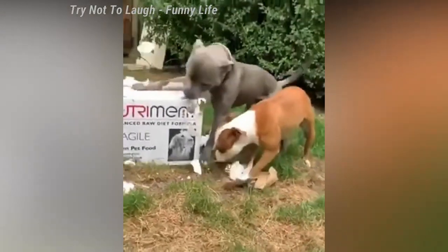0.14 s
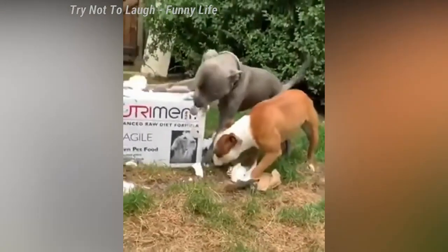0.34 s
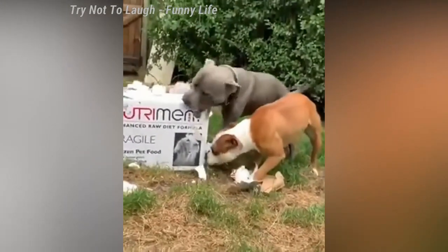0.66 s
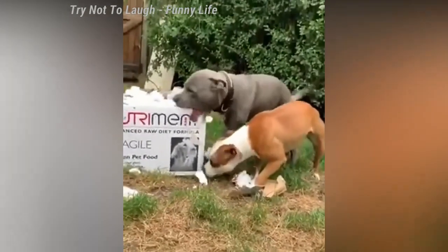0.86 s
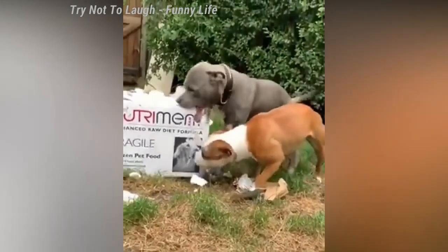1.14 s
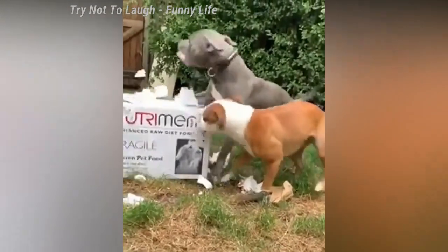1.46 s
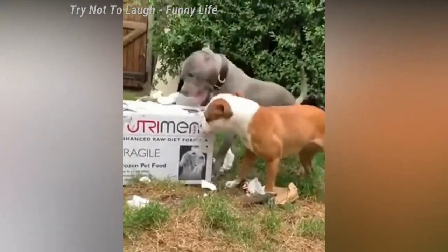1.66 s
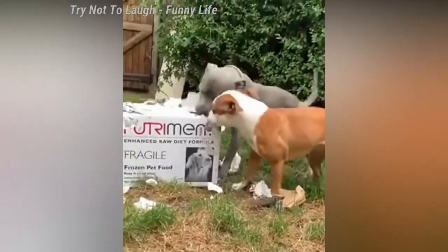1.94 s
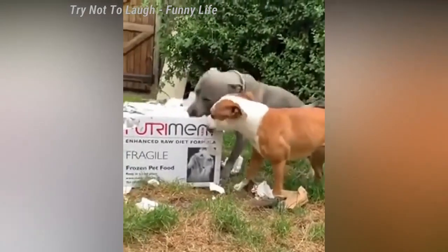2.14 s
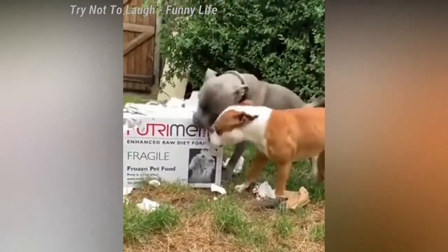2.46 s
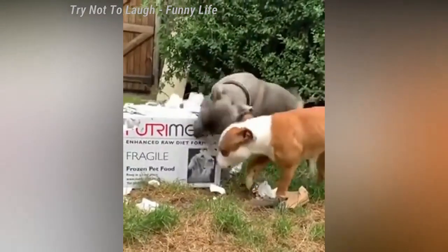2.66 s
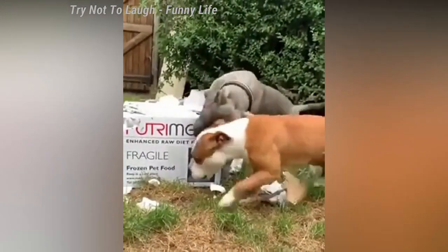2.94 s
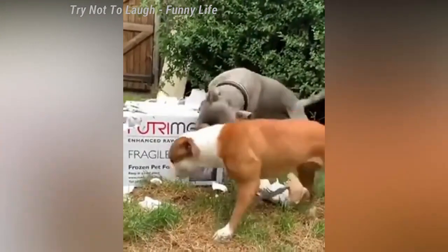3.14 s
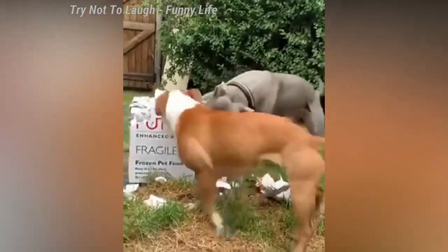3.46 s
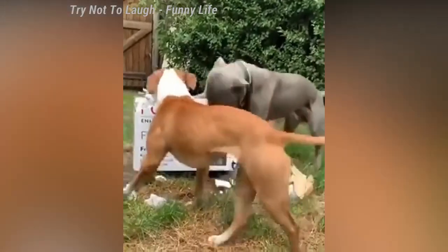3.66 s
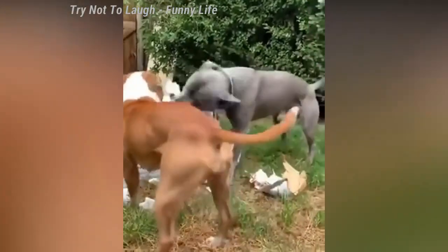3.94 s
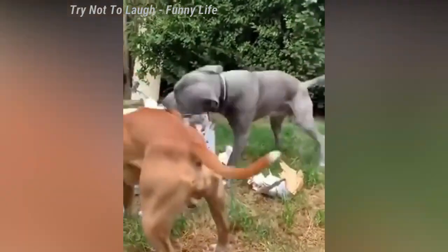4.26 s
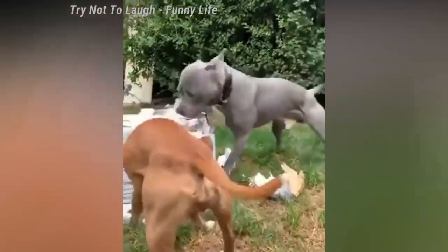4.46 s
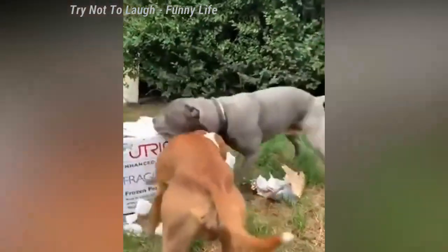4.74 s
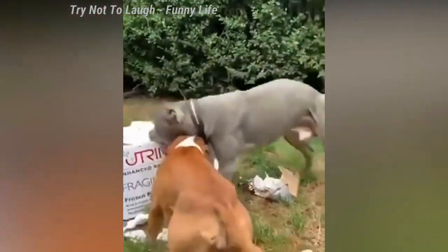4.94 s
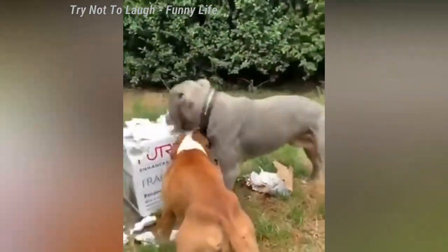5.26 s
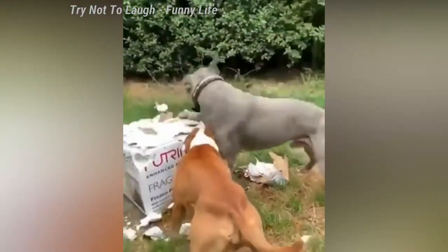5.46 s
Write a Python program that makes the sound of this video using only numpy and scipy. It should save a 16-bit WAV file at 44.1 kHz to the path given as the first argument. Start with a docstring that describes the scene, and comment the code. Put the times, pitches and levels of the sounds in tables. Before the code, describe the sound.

Dogs tear at a foam-lined cardboard box outdoors, with gritty crackling, short rips, sharp snaps and hollow knocks over a faint low rumble.

```python
"""Crackle, rips and sharp snaps as two dogs bite and tear at a foam-lined cardboard box on a lawn.
Clumped random breaks drive the foam, the ringing walls and the hollow; each snap adds a crack and blows.
Below lie a low rumble of filtered noise that swells at each snap, and a drifting sine drone that fades.
A short noise blur follows the box; the two channels differ in phase, unsteadily, in the treble."""
import sys
import numpy as np
from scipy import signal
from scipy.fft import rfft, irfft
from scipy.io import wavfile
from scipy.ndimage import uniform_filter1d

SR = 44100
rng = np.random.default_rng(int(sys.argv[2]) if len(sys.argv) > 2 else 0)


def inscribe(sig):
    """Save sig as 16-bit PCM at rate SR to the path in sys.argv[1].

    A 1-D sig is mono; a 2-D sig holds one channel per row.
    Samples are clipped to [-1, 1] before scaling.
    """
    pcm = np.round(np.clip(np.atleast_2d(sig).T, -1, 1) * 32767)
    wavfile.write(sys.argv[1], SR, pcm.astype(np.int16))


N = 246519

# Single breaks and knocks. Each row: start in seconds, foam level in dB, walls level in dB,
# hollow level in dB, struck wall pitch in Hz, struck hollow pitch in Hz, nominal T60 in seconds.
SNAP_EVENTS = [(0.043, -44, -20, -34, 1020, 394, 0.021), (0.433, -37, -38, -33, 1160, 270, 0.033),
               (0.643, -64, -33.5, -33.5, 660, 456, 0.017), (0.7108, -40, -27, -30.5, 1230, 173, 0.059),
               (0.762, -32, -17.5, -36, 1640, 482, 0.0062), (0.9419, -29.5, -38, -43, 1960, 149, 0.015),
               (0.970, -42, -51, -50, 2000, 200, .009), (1.013, -42, -52, -40, 2000, 200, 0.01),
               (1.1638, -13.5, -28, -30.5, 1690, 386, 0.028), (1.2045, -22, -26, -26, 690, 307, 0.023),
               (1.223, -16, -12.5, -15.5, 1340, 395, 0.011), (1.2964, -38, -22, -45, 1060, 136, 0.014),
               (1.383, -28, -12.5, -21, 2320, 228, 0.0091), (1.437, -28, -39, -21, 2100, 191, 0.012),
               (1.458, -45, -14, -22, 1070, 248, 0.012), (1.4694, -50, -15.5, -20.5, 1100, 290, 0.012),
               (1.49, -27, -20, -33, 1600, 250, 0.022), (1.734, -34.5, -35, -39, 1220, 248, 0.035),
               (1.85, -67, -31, -57, 1200, 154, 0.035), (2.0217, -34, -40, -36, 960, 180, 0.055),
               (2.392, -51, -25.5, -37, 1040, 171, 0.031), (2.628, -55, -53, -29.5, 700, 233, 0.041),
               (2.646, -37, -26.5, -26, 970, 245, 0.0063), (2.676, -42, -33, -29, 1250, 198, 0.018),
               (2.8, -32, -35, -22, 700, 266, 0.022), (2.813, -30.5, -18.5, -25.5, 1270, 143.6, 0.011),
               (2.8202, -23.5, -33, -23.5, 1500, 197, 0.0096), (2.888, -34, -34, -22.5, 721, 303, 0.0057),
               (3.074, -38, -27, -26.5, 770, 468, 0.0062), (3.1555, -45.5, -29.5, -9, 890, 214, 0.023),
               (3.328, -31, -33, -19.5, 704, 200, 0.011), (3.3546, -24, -21.5, -13, 690, 174, 0.027),
               (3.4293, -30, -14.5, -15, 1880, 330, 0.032), (3.435, -34, -39, -20, 1990, 260, 0.0078),
               (3.4644, -32.5, -41, -24.5, 1600, 378, 0.021), (3.532, -44, -40, -25.5, 700, 260, 0.015),
               (3.5714, -33.5, -30, -32.5, 1100, 385, 0.041), (3.608, -19, -18, -16.5, 950, 410, 0.011),
               (3.6318, -37, -24.5, -21.5, 710, 332, 0.039), (3.684, -30, -29, -12.5, 1020, 254, 0.0093),
               (3.7608, -38, -51, -14.5, 713, 557, 0.0086), (3.77, -19, -17.5, -10.5, 690, 254, 0.01),
               (4.0787, -30.5, -21, -16, 1260, 250, 0.042), (4.345, -51, -37, -58, 703, 159, 0.029),
               (4.4041, -43, -24, -21, 1030, 160, 0.047), (4.6148, -46, -19.5, -23, 880, 570, 0.023),
               (4.6621, -39, -44, -32.5, 1170, 149, 0.24), (4.8378, -45, -25.5, -25.5, 910, 280, 0.019),
               (4.853, -37, -32, -31, 1080, 242, 0.012), (5.008, -55, -18.5, -36, 1040, 197, 0.017),
               (5.034, -27.5, -17.5, -18, 1050, 290, 0.019), (5.0609, -37, -16, -19.5, 1240, 384, 0.005),
               (5.1211, -35, -23, -17.5, 1050, 220, 0.021), (5.2025, -25, -12.5, -39, 2600, 133, 0.0036),
               (5.2058, -36, -18.5, -25, 870, 400, 0.0058), (5.2464, -25, -24.5, -19, 1960, 328, 0.049),
               (5.295, -20, -13.5, -28, 2400, 435, 0.01), (5.2994, -26.5, -11.5, -17.5, 2410, 430, 0.0068),
               (5.407, -24, -18, -12.5, 835, 228, 0.015), (5.538, -51, -27.5, -42, 1210, 198, 0.018)]
# Modes of the cardboard walls. Each row: frequency in Hz, bandwidth in Hz, relative level in dB.
WALL_MODES = [(715, 148, 14), (861, 77, 4), (1082, 207, 13), (1659, 356, 8), (2103, 360, 8), (2625, 820, 5)]
# Modes of the air in the box. Each row: frequency in Hz, bandwidth in Hz, relative level in dB.
HOLLOW_MODES = [(113.1, 29, 0.5), (171.6, 85, -8), (200.5, 82, -6), (258.8, 176, 8), (328, 130, -1),
                (408, 155, -1.5), (602, 510, -14)]
# Spectrum of small foam beads breaking. Each row: frequency in Hz, relative level in dB.
FINE_FOAM_COLOUR = [(1500, -14), (4000, 3.5), (5000, 10.5), (6500, 5), (7800, 3), (9300, 4.5), (10600, 1.5),
                    (11700, 1.5), (12500, -10)]
# Spectrum of larger foam lumps breaking. Each row: frequency in Hz, relative level in dB.
COARSE_FOAM_COLOUR = [(600, -11), (2000, 6.5), (2800, 8.5), (4200, 19.5), (5200, -7), (7500, -29.5),
                      (12500, -19.5)]

# lumps break when foam and walls are both strained: weights of the two dB levels, then offsets
LUMPS_FROM_FOAM, LUMPS_FROM_WALLS = 0.61, 0.4
CHEW_LUMPS_DB, RIP_LUMPS_DB, SNAP_LUMPS_DB, CRACK_LUMPS_DB = -0.5, -2, -5.5, 7
LEAD_IN_S, LEAD_IN_DB = 0.018, -16  # faint noise that swells before a break


def gain_of(db):
    """Decibels to gain."""
    return 10 ** (np.asarray(db) / 20)


def evened(x):
    """Scales to rms 1."""
    return x / np.sqrt(np.mean(x ** 2) + 1e-20)


def smooth_noise(width):
    """Noise of rms 1, averaged twice over width samples."""
    noise = rng.standard_normal(N)
    return evened(uniform_filter1d(uniform_filter1d(noise, width), width))


def patchy_noise(shape, bins, frames):
    """Noise of rms 1 on a spectrogram grid, averaged over bins, then frames."""
    noise = rng.standard_normal(shape)
    return evened(uniform_filter1d(uniform_filter1d(noise, bins, axis=0), frames, axis=1))


def read(points, hz):
    """Reads a curve on a log-frequency axis."""
    f, value = np.transpose(points)
    return np.interp(np.log(hz + 1), np.log(f + 1), value)


def add(mix, start_s, sound):
    """Adds sound into the rows of mix from start_s."""
    part = mix[:, round(start_s * SR):][:, :sound.shape[1]]
    part += sound[:, :part.shape[1]]


def colour_taps(points):
    """Minimum-phase response of a spectrum, energy 1."""
    hz = abs(np.fft.fftfreq(4096, 1 / SR))
    log_gain = np.log(gain_of(read(points, hz)))
    spectrum = np.exp(np.conj(signal.hilbert(log_gain)))
    taps = np.fft.ifft(spectrum).real[:2048]
    return taps / np.linalg.norm(taps)


def mode_taps(modes, late, near_hz=None, fall_db_per_octave=0):
    """Ringing of decaying modes, energy 1; a blow favours modes near its pitch."""
    taps = 0
    for hz, width_hz, db in modes:
        # bending waves travel slower at low pitch, so low modes speak later; late is in s * sqrt(Hz)
        t = np.maximum(np.arange(4096) / SR - late / np.sqrt(hz), 0)
        away_db = fall_db_per_octave * abs(np.log2(hz / (near_hz or hz)))
        onset = 1 - np.exp(-0.9 * hz * t)
        ring = np.exp(-np.pi * width_hz * t) * np.sin(2 * np.pi * hz * t) * onset
        taps = taps + gain_of(db - away_db) * np.sqrt(width_hz) * ring
    taps = np.diff(taps)  # a panel radiates its motion, not its position
    return taps / np.linalg.norm(taps)


def crackle(per_s, spread_db, clump_db):
    """Tiny breaks of uneven size mixed with hiss, both swelling in clumps."""
    happens = rng.random(N) < per_s / SR
    size = gain_of(spread_db * np.minimum(rng.exponential(1, N), 4)) * happens
    breaks = evened(size * rng.standard_normal(N))
    hiss = 1.4 * rng.standard_normal(N)
    return evened((breaks + hiss) * gain_of(clump_db * smooth_noise(200)))


def rustle():
    """Power of worrying: surges some tens of milliseconds long, and short ticks of uneven size."""
    surge_db, ticks_per_s, ticks_db, tick_decay_s = 2.0, 60, 6, 0.0024
    surges = gain_of(surge_db * smooth_noise(1500)) ** 2
    ticks = rng.exponential(1, N) * (rng.random(N) < ticks_per_s / SR)
    ticks = signal.lfilter([1], [1, -np.exp(-1 / (tick_decay_s * SR))], ticks)
    return surges * (1 + gain_of(ticks_db) * ticks)


def lumps(foam_db, walls_db, extra_db):
    """Level in dB of the coarse foam from the strain on foam and walls."""
    return LUMPS_FROM_FOAM * foam_db + LUMPS_FROM_WALLS * walls_db + extra_db


def break_shape(t60_s, strain_s, hold_s):
    """A faint swell, then a steep rise, the break, and a weaker rattle as the piece comes loose."""
    u = np.arange(5000) / SR - LEAD_IN_S
    lead_in = gain_of(LEAD_IN_DB) * np.minimum(1 + u / LEAD_IN_S, 1)
    before = np.maximum(np.clip(u / strain_s, 0, 1) ** 2.4, lead_in)
    after = np.maximum(u - strain_s - hold_s, 0) / max(t60_s, 0.004)
    return before * (gain_of(-60 * after) + gain_of(-12.5 - 3.5 * after))


def tugging():
    """Strength with which worrying, rips and snaps drive fine foam, coarse foam, walls and hollow."""
    # Steady worrying. Each row: time in seconds, then foam, walls and hollow levels in dB before the rustle.
    chewing = [(0.0, -30, -39, -44.5), (0.28, -73, -79, -53), (0.47, -48, -52, -46.5),
               (1.17, -44.5, -53.5, -52), (1.26, -38.5, -39, -40), (1.34, -32, -42.5, -31.5),
               (1.46, -47, -54, -42), (1.59, -41, -50.5, -44), (1.76, -57, -55, -51.5),
               (2.021, -58.5, -57.5, -55.5), (2.5, -50, -55, -49.5), (2.68, -52, -54, -47),
               (2.82, -48, -66, -37.5), (3.14, -48, -46, -47), (3.58, -45.5, -50.5, -39.5),
               (3.95, -43.5, -49.5, -42), (4.14, -56, -57.5, -53), (4.39, -61, -59.5, -50),
               (4.67, -54.5, -59, -53), (4.79, -47.5, -54.5, -46.5), (4.98, -53, -67, -44.5),
               (5.07, -42, -40, -42), (5.17, -35.5, -39.5, -34.5), (5.32, -35.5, -37.5, -38),
               (5.481, -35.5, -39, -36.5), (5.59, -51.5, -49.5, -42)]
    # Longer rips. Each row: start in seconds, length in seconds, share of the length spent swelling
    # (held to 0.1-0.9), then foam, walls and hollow levels in dB.
    rips = [(0, 0.079, 0.49, -25.5, -37.5, -54), (0.146, 0.088, 0.53, -42, -56, -66),
            (0.25, 0.086, 0.35, -50, -45.5, -66), (0.81, 0.061, 0.16, -23.5, -31.5, -68),
            (0.859, 0.093, 0.52, -34.5, -53, -68), (1.05, 0.099, 0.32, -26.5, -38.5, -42.5),
            (1.365, 0.15, 0.62, -23.5, -25.5, -29), (1.594, 0.18, 0.26, -34.5, -47.5, -39.5),
            (2.231, 0.063, 0.32, -46, -46.5, -40), (2.516, 0.068, 0.62, -44, -43, -43),
            (2.299, 0.058, .3, -45.5, -52, -55), (2.395, 0.053, .5, -46.5, -51, -50),
            (3.02, 0.054, 0.73, -47, -60, -47), (2.596, 0.092, 0.14, -35, -59, -41),
            (2.78, 0.15, 0.2, -35, -39, -40), (2.88, 0.037, 0.29, -32.5, -34.5, -35.5),
            (2.728, 0.058, 0.91, -38.5, -43, -37.5), (2.98, 0.067, 0.91, -48, -72, -37.5),
            (3.294, 0.096, 0.4, -39, -47, -27.5), (3.342, 0.057, 0.2, -27.5, -31.5, -39),
            (3.648, 0.057, 0.45, -34.5, -33.5, -31), (3.695, 0.06, 0.65, -29.5, -42, -53),
            (3.744, 0.039, 0.91, -25, -25, -21), (4.95, 0.16, 0.15, -40.5, -38, -34.5),
            (5.023, 0.016, 0.55, -30, -28, -26.5), (5.09, 0.038, 0.57, -27.5, -28.5, -30.5),
            (5.215, 0.03, 0.32, -26, -54, -54), (5.361, 0.086, 0.6, -25.5, -27, -28)]
    foam_t60_share = 0.65  # foam falls silent sooner than the walls
    foam_strain_s, foam_hold_s = 0.0011, 0.0012  # foam gives way at once and shatters for a moment

    s, foam_db, walls_db, hollow_db = np.transpose(chewing)
    levels_db = foam_db, lumps(foam_db, walls_db, CHEW_LUMPS_DB), walls_db, hollow_db
    power = gain_of([np.interp(np.arange(N) / SR, s, db) for db in levels_db]) ** 2
    power[:3] *= rustle()  # all but the hollow

    for start_s, length_s, share, foam_db, walls_db, hollow_db in rips:
        u = np.arange(round(length_s * SR)) / SR / length_s
        rise_and_fall = np.interp(u, [0, np.clip(share, 0.1, 0.9), 1], [0, 1, 0])
        swell = np.sin(np.pi / 2 * rise_and_fall)
        levels_db = foam_db, lumps(foam_db, walls_db, RIP_LUMPS_DB), walls_db, hollow_db
        add(power, start_s, np.outer(gain_of(levels_db), swell) ** 2)

    for start_s, foam_db, walls_db, *_, t60_s in SNAP_EVENTS:
        levels_db = foam_db, lumps(foam_db, walls_db, SNAP_LUMPS_DB)
        shape = break_shape(foam_t60_share * t60_s, foam_strain_s, foam_hold_s)
        add(power[:2], start_s - LEAD_IN_S, np.outer(gain_of(levels_db), shape) ** 2)
    return np.sqrt(power)


def mottled(x, patch_db):
    """Pieces of every size break in turn, so the colour shifts in patches."""
    z = signal.stft(x, SR, nperseg=256, noverlap=192)[2]
    z = z * gain_of(patch_db * patchy_noise(z.shape, 3, 24))
    return signal.istft(z, SR, nperseg=256, noverlap=192)[1][:N]


def knocks():
    """Each snap cracks once and shakes the part of the walls and hollow nearest its pitch."""
    crack_fine_db = 6
    brittle_db, usual_t60_s = 8, 0.018  # extra crack for each halving of T60 below the usual
    strain_s = 0.0033  # build-up before a break
    wall_rattle_db, hollow_rattle_db = -11, -8.5  # loose shaking beside the clean blow
    wall_fall_db_per_octave, hollow_fall_db_per_octave = 18, 24.2

    out = np.zeros((1, N))
    shakes = rng.standard_normal((len(SNAP_EVENTS), 5000))
    fine, coarse = colour_taps(FINE_FOAM_COLOUR), colour_taps(COARSE_FOAM_COLOUR)
    for shake, snap in zip(shakes, SNAP_EVENTS):
        start_s, foam_db, walls_db, hollow_db, wall_hz, hollow_hz, t60_s = snap
        lumps_db = lumps(foam_db, walls_db, CRACK_LUMPS_DB)
        crack = gain_of(foam_db + crack_fine_db) * fine + gain_of(lumps_db) * coarse
        brittleness = gain_of(brittle_db * np.log2(usual_t60_s / t60_s))
        add(out, start_s + 0.0018, brittleness * crack[None])

        wall_ring = mode_taps(WALL_MODES, 0.0484, wall_hz, wall_fall_db_per_octave)
        hollow_ring = mode_taps(HOLLOW_MODES, 0.0648, hollow_hz, hollow_fall_db_per_octave)
        shaking = shake * break_shape(t60_s, strain_s, 0)
        for db, rattle_db, ring in ((walls_db, wall_rattle_db, wall_ring),
                                    (hollow_db, hollow_rattle_db, hollow_ring)):
            rattle = signal.fftconvolve(shaking, ring)
            add(out, start_s - LEAD_IN_S - 0.0015, gain_of(db + rattle_db) * rattle[None])
            add(out, start_s - 0.0005, gain_of(db) * ring[None] / abs(ring).max())
    return out[0]


def blurred(x):
    """Hedge, fence and ground throw back a short blur: decaying noise after a 4 ms gap."""
    blur_db, blur_t60_s = -17.5, 0.17
    t = np.arange(6000) / SR
    blur = rng.standard_normal(6000) * gain_of(-60 * t / blur_t60_s) * (t > 0.004)
    return x + gain_of(blur_db) * signal.oaconvolve(x, blur / np.linalg.norm(blur))[:N]


def box():
    """Crackle excites the foam, the cardboard walls and the air inside; knocks join them."""
    foam_crackle = crackle(3000, 0.32, 0.8)
    wall_crackle, hollow_crackle = crackle(900, 4.8, 1.0), crackle(600, 2.8, 3.4)
    drives = tugging() * [foam_crackle, foam_crackle, wall_crackle, hollow_crackle]
    bodies = (colour_taps(FINE_FOAM_COLOUR), colour_taps(COARSE_FOAM_COLOUR),
              mode_taps(WALL_MODES, 0.0429), mode_taps(HOLLOW_MODES, 0.0671))
    fine, coarse, walls, hollow = (signal.oaconvolve(d, b)[:N] for d, b in zip(drives, bodies))
    return blurred(mottled(fine + coarse + walls, 2.6) + hollow + knocks())


def rumble():
    """Low noise that swells with each snap, as the box is knocked on the ground."""
    # Steady rumble. Each row: time in seconds, level in dB.
    rumble_level = [(0, -45), (2.6, -44.5), (3.5, -52), (5.59, -46)]
    # Rumble spectrum. Each row: frequency in Hz, relative level in dB.
    rumble_colour = [(15, -24), (36, 3.5), (43, -10), (46, -5), (50, -1), (60, -6), (78, 1.5), (130, -13),
                     (300, -32)]
    thud_db, thud_t60_s = -25.5, 0.58  # thud level is relative to the snap's hollow level

    hz, t = np.fft.rfftfreq(N, 1 / SR), np.arange(N) / SR
    spectrum = rfft(rng.standard_normal(N)) * gain_of(read(rumble_colour, hz))
    low = evened(irfft(spectrum, N))
    power = gain_of(np.interp(t, *np.transpose(rumble_level)))[None] ** 2
    for start_s, _, _, hollow_db, *_ in SNAP_EVENTS:
        thud_level_db = hollow_db + thud_db - 60 * t[None, :SR // 2] / thud_t60_s
        add(power, start_s, gain_of(thud_level_db) ** 2)
    return np.sqrt(power[0]) * low


def drone():
    """A far low sine drifts a little in pitch and fades."""
    drone_hz, drift_share = 46.2, 0.03  # drift is rms
    start_db_rms, fade_db_per_s = -39.5, 9.5
    t = np.arange(N) / SR
    drift = evened(sum(np.sin(2 * np.pi * (f * t + rng.random())) for f in np.geomspace(0.7, 5, 8)))
    turns = np.cumsum(drone_hz * (1 + drift_share * drift)) / SR
    return np.sqrt(2) * gain_of(start_db_rms - fade_db_per_s * t) * np.sin(2 * np.pi * turns)


def scene():
    """Box, rumble and drone summed, alike in both channels."""
    return np.tile(box() + rumble() + drone(), (2, 1))


def record(dry):
    """The two channels slip in phase towards the treble, unsteadily; then the band limit."""
    # Phase by which left leads right. Each row: frequency in Hz, lead in half turns.
    turn = [(1700, 0), (2300, .12), (3600, .25), (4250, 1), (5500, 1), (6100, 2), (10700, 2.05), (11250, 3)]
    # How far that lead wanders. Each row: frequency in Hz, rms wander in radians.
    wander = [(40, 0.0089), (300, 0.01), (600, 0.14), (1700, 0.12), (2300, 1.27), (3800, 1.42),
              (4400, 0.26), (5400, 0.12), (5850, 1.8), (6400, 0.12), (7900, 0.24), (10000, 0.8),
              (11300, 3.2), (12100, 0.1)]
    slide_share = 0.035  # rms share by which the lead curve is shifted in frequency
    edge_hz = 12200

    hz, _, z = signal.stft(dry, SR, nperseg=512, noverlap=384)
    drift = patchy_noise(z.shape[1:], 8, 12)
    slide = patchy_noise(z.shape[1:], 16, 30)
    lead = np.pi * read(turn, hz[:, None] * (1 + slide_share * slide))
    lead = lead + read(wander, hz)[:, None] * drift
    z *= np.exp([0.5j * lead, -0.5j * lead])
    pair = signal.istft(z, SR, nperseg=512, noverlap=384)[1][:, :N]
    low_pass = signal.firwin(511, edge_hz, window=("kaiser", 9), fs=SR)
    return signal.oaconvolve(pair, low_pass[None], "same")


dry = scene()
out = record(dry)
inscribe(out)
```